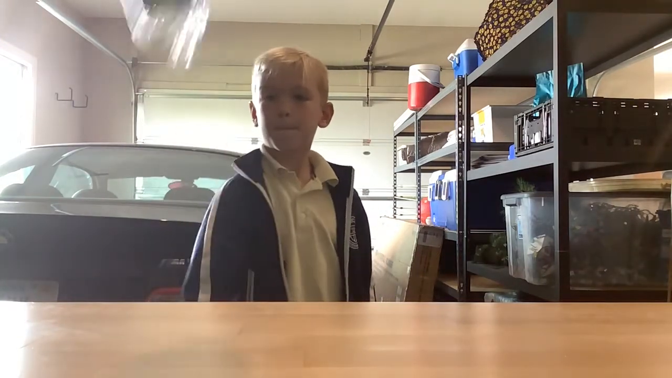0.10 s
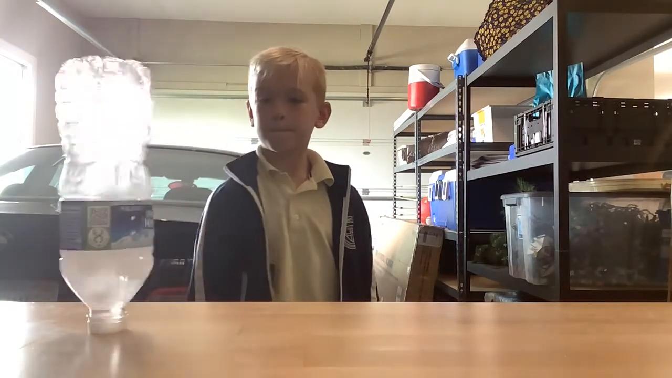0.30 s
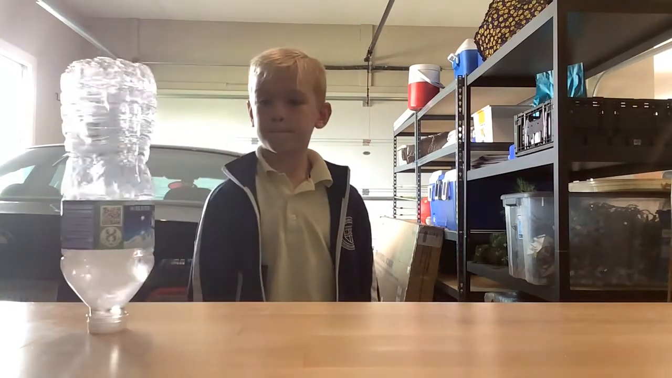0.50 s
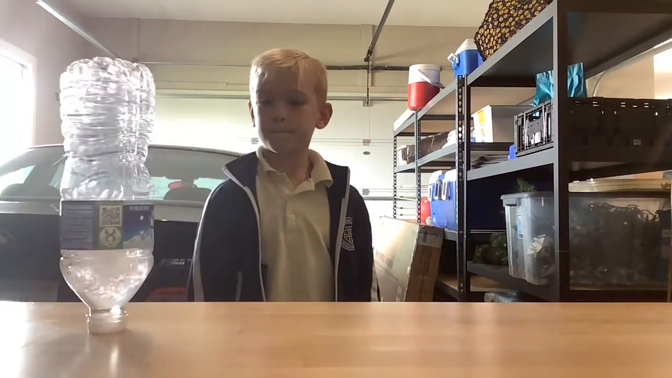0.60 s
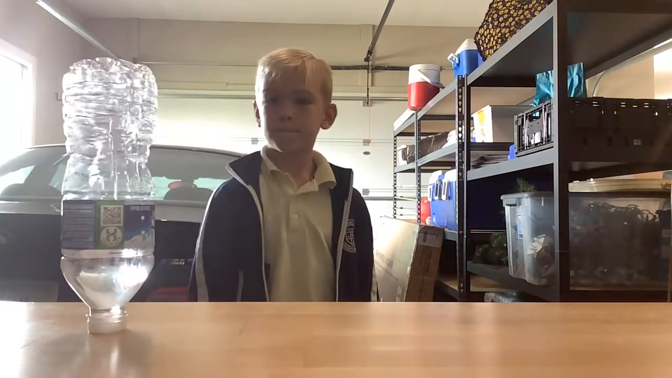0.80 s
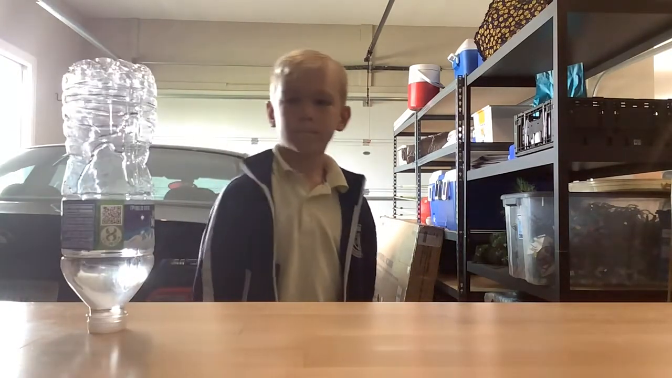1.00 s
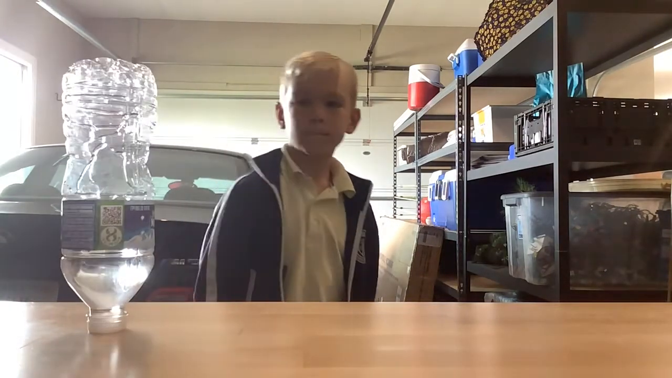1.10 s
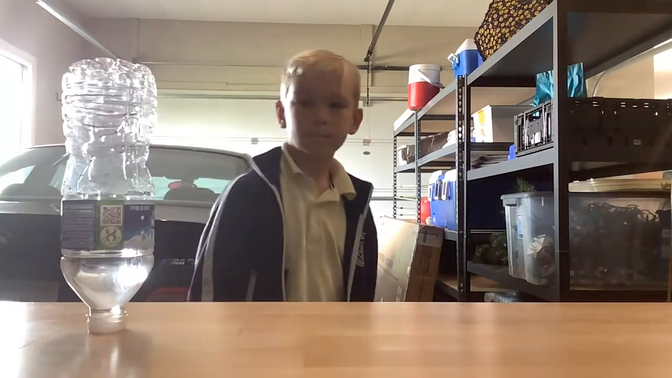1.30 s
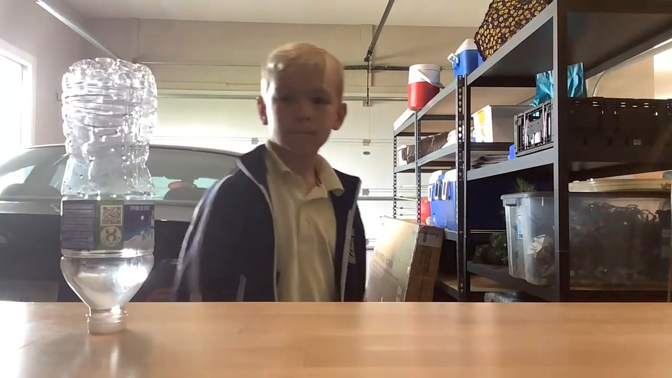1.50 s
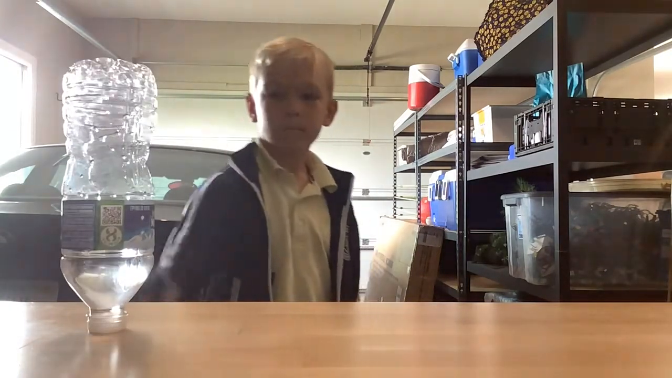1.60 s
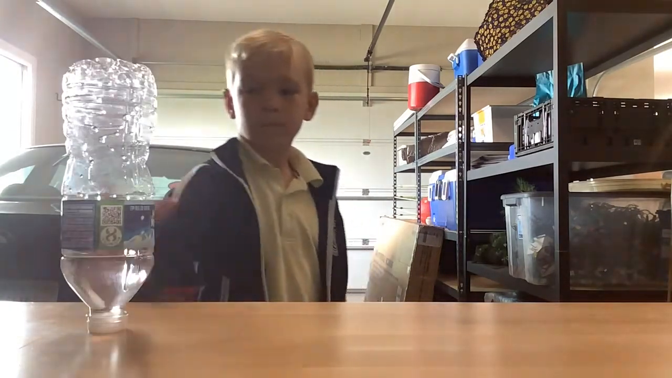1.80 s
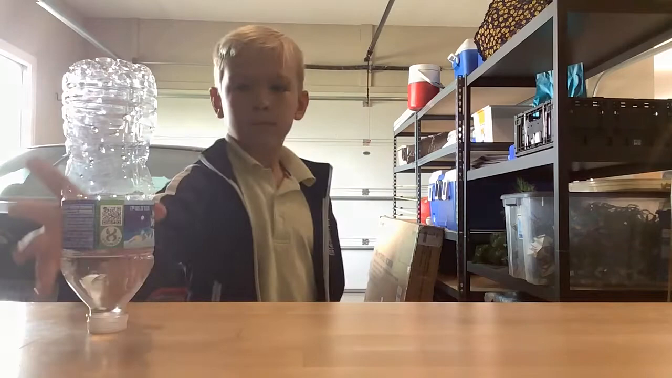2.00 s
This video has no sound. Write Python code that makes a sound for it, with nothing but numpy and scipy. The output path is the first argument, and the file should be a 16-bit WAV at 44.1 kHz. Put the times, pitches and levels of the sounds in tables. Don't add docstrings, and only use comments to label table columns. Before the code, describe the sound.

Sharp crack and thump of a water bottle landing on a wooden table in an echoing garage

```python
import sys
import numpy as np
from scipy import signal
from scipy.fft import rfft, irfft
from scipy.io import wavfile
from scipy.ndimage import uniform_filter1d

SR = 44100
rng = np.random.default_rng(int(sys.argv[2]) if len(sys.argv) > 2 else 0)


def inscribe(sig):
    pcm = np.round(np.clip(np.atleast_2d(sig).T, -1, 1) * 32767)
    wavfile.write(sys.argv[1], SR, pcm.astype(np.int16))


N = 88200
T = np.arange(N) / SR


def undb(db):
    return 10 ** (np.asarray(db) / 20)


def read(table, hz):
    rows = np.array(table, float)
    return np.interp(np.log(np.maximum(hz, 1)), np.log(rows[:, 0]), rows[:, 1])


def noise(table, peaks=(), ripple_db=0):
    hz = np.fft.rfftfreq(N, 1 / SR)
    db = read(table, hz)
    for centre, width, gain in peaks:
        db = db + gain * np.exp(-((hz - centre) / width) ** 2)
    db = db - 18 * np.log2(np.maximum(hz / table[-1][0], 1))
    ripple_spacing_hz = 24.8
    ripple = np.interp(hz / ripple_spacing_hz, np.arange(4000), rng.standard_normal(4000))
    spectrum = rfft(rng.standard_normal(N)) * undb(db + ripple_db * ripple)
    x = irfft(spectrum, N)
    return x / np.std(x)


def fade(start, t60, rise=0.0001):
    t = np.maximum(T - start, 0)
    return (1 - np.exp(-t / rise)) * undb(-60 * t / t60)


def bands(x, count=3):
    lowest_hz = 25
    hz, spectrum = np.fft.rfftfreq(N, 1 / SR), rfft(x)
    place = count * np.log2(np.maximum(hz, lowest_hz) / lowest_hz)
    for k in range(10 * count):
        weight = np.cos(np.pi / 2 * np.clip(place - k, -1, 1)) ** 2
        yield lowest_hz * 2 ** (k / count), irfft(spectrum * weight, N)


def walk(rate):
    k = int(SR / rate)
    steps = np.repeat(rng.standard_normal(N // k + 1), k)
    return 1.3 * uniform_filter1d(uniform_filter1d(steps, k), k)[:N]


BLOW_S = [
    .2222,
    .2258,
    .2292,
    .2316,
    .2495,
    .2665,
]
# crack level/dB, body level/dB
BLOWS = [
    (-14, -4),
    (-14.5, -25.5),
    (-16.5, -26),
    (-13, -20),
    (-33, -21),
    (-26, -13.5),
]
# f/Hz, level/dB, t60/s
BODY = [(93.5, -7, 0.12), (143, 0, .09), (178, -8, .09), (335.7, -14.5, 0.24), (379.5, -4, 0.15),
        (518.3, -6, 0.11), (664.3, -13.5, 0.055), (924.4, -4.5, .07), (1060, -14, 0.095),
        (1415, -10, 0.089), (1510, -10, 0.091), (1792, -8, .09), (2221, -10.5, .08), (2986, -9.5, 0.023)]
# f/Hz, level/dB
CRACK = [(500, -13.5), (1200, -6), (2300, -9), (2900, 2.5), (5200, -10.5), (7900, -1), (11000, -8),
         (15600, -17)]


def landing():
    out, crack, rattle = np.zeros(N), noise(CRACK), noise(CRACK)
    low_lag_s, lag_from_hz = 0.002, 4000
    for start, (crack_db, body_db) in zip(BLOW_S, BLOWS):
        out += undb(crack_db) * crack * fade(start, 0.022, rise=0.00035)
        out += undb(crack_db - 12) * rattle * fade(start, 0.017)
        for hz, db, t60 in BODY:
            at = start + low_lag_s * (np.sqrt(300 / hz) - np.sqrt(300 / lag_from_hz))
            tone = np.sin(2 * np.pi * hz * (T - at))
            out += undb(body_db + db) * tone * fade(at, t60, rise=0.25 / hz)
    return out


# f/Hz, level/dB, t60/s, delay t/s
SNAP = [(7780, -7.5, .01, 0), (12404, -13, 0.0074, 0), (2850, -8, .014, -.0004), (3270, -11, 0.007, 0),
        (1300, -10, .01, .0006), (10500, -15, .008, .0003)]


def snap():
    out = np.zeros(N)
    for hz, db, t60, lag in SNAP:
        tone = np.sin(2 * np.pi * hz * (T - BLOW_S[0]))
        out += undb(db) * tone * fade(BLOW_S[0] + lag, t60, rise=0.0003)
    return out


# f/Hz, level/dB
SURGE = [(100, 1), (600, -3.5), (1500, -12), (3000, -5), (5000, -12.5), (7800, -11.5), (8800, -36.5),
         (16000, -38)]
# f/Hz, width f/Hz, level/dB
SURGE_PEAKS = [(3100, 500, 7), (7700, 600, 9.5), (1480, 190, 3.5), (4300, 360, 11)]


def surge():
    hit, start = BLOW_S[0], 0.2005
    level_db, swell_db_per_s = -18, 1500.5
    swell = undb(level_db + swell_db_per_s * np.minimum(T - hit, 0))
    swell = swell * (T > start) * (T < hit + 0.002)
    brush = undb(-45.5) * noise(CRACK) * fade(start, 0.018, rise=0.0011)
    return noise(SURGE, SURGE_PEAKS) * uniform_filter1d(swell, size=40) + brush


# f/Hz, level/dB
SLOSH = [(60, -8), (150, -2), (400, 0), (900, -3.5), (1800, -8), (2500, -20)]


def slosh():
    uneven_db = 2 * walk(150)
    return undb(-16.5 + uneven_db) * noise(SLOSH) * fade(BLOW_S[0], 0.2, rise=0.009)


# f/Hz, level/dB, t60/s
RING = [(84.6, -19, .24), (148, -17, .2), (370.2, -15, 0.28), (860, -21.5, .15), (1785, -24.5, .2)]


def ring():
    out = np.zeros(N)
    for hz, db, t60 in RING:
        out += undb(db) * np.sin(2 * np.pi * hz * T) * fade(0.238, t60, rise=0.012)
    return out


# f/Hz, t60/s
GARAGE_T60 = [(80, 0.95), (250, 0.58), (700, 0.62), (1800, 0.76), (3200, .72), (8500, 0.6), (15000, 0.36)]


def echo(x, start, rise):
    out = 0
    for hz, band in bands(x, count=6):
        clumps_db = 1.34 * walk(70)
        env = fade(start, read(GARAGE_T60, hz), rise) * undb(clumps_db)
        power = (env * np.std(band)) ** 2
        knee_db = -89.5 + 3.5 * np.log2(hz / 1000)
        out = out + band * env * power / (power + undb(knee_db) ** 2 / 2)
    return out


# f/Hz, level/dB (per Hz)
GARAGE = [(35, -33.5), (60, -8.5), (283, -6), (675, -4), (2190, -11.5), (9170, -13), (15200, -22.5),
          (16000, -43)]
# f/Hz, width f/Hz, level/dB
GARAGE_PEAKS = [(2968, 380, 2.5), (6660, 280, 3.5), (2350, 380, -5.5), (5100, 120, 1), (730, 140, 3),
                (8200, 1400, 2), (5840, 250, -3.5), (403, 100, 4)]


def garage():
    return echo(undb(-10.5) * noise(GARAGE, GARAGE_PEAKS, ripple_db=2), BLOW_S[0], rise=0.027)


# f/Hz, level/dB
EARLIER = [(300, -23.5), (1000, -2), (2200, -6.5), (3500, -2.5), (5700, -3), (9600, -12.5), (13000, -14.5),
           (16500, -30.5)]


def earlier_toss():
    return echo(undb(-55) * noise(EARLIER, ripple_db=2), 0, rise=1e-5)


TICK_S = [
    .912,
    .985,
    1.312,
    1.3465,
    1.59,
]
# level/dB, t60/s
TICKS = [
    (-70, 0.036),
    (-75, .04),
    (-81, 0.17),
    (-65.5, 0.058),
    (-77, .04),
]
# f/Hz, level/dB
TICK = [(1000, -6), (3000, 3), (4800, -4), (6800, 1.5), (9000, -1), (11800, 0), (15000, -7), (16500, -25)]


def ticks():
    envelope = np.zeros(N)
    for start, (db, t60) in zip(TICK_S, TICKS):
        envelope += undb(db) * fade(start, t60, rise=0.0012)
    return noise(TICK) * envelope


# f/Hz, level/dB
HUM = [(59.3, -66.5), (118.4, -68.5), (177.6, -70), (209.9, -74), (236.9, -63), (355.3, -70), (523, -79)]


def hum():
    out = np.zeros(N)
    for hz, db in HUM:
        level = undb(db + 3.5 + 2.5 * walk(9.9))
        pitch_hz = hz + 1.4 * walk(4.9) / 2
        out += level * np.sin(2 * np.pi * np.cumsum(pitch_hz) / SR)
    return out


# f/Hz, level/dB (per Hz)
AIR = [(30, -45.5), (52, -9), (240, -7.5), (275, -14.5), (340, -6.5), (480, -17), (1300, -31), (2000, -44)]


def air():
    return undb(-56.5) * sum(band * undb(walk(9)) for hz, band in bands(noise(AIR)))


# f/Hz, level/dB (per Hz)
HISS = [(500, -8.5), (2000, 1), (4200, 1.5), (6600, -0.5), (9000, -1.5), (13000, -3.5), (15500, -10.5),
        (16500, -27.5)]


def hiss():
    return undb(-79.5) * noise(HISS, [(6600, 250, 2.5)])


def scene():
    bottle = landing() + snap() + surge() + slosh() + ring()
    room = garage() + earlier_toss()
    return (bottle + room + ticks() + hum() + air() + hiss())[None]


def band_limit(x):
    return signal.sosfilt(signal.butter(12, 16830, fs=SR, output="sos"), x)


def record(dry):
    t = np.maximum(T - 0.23146, 0)
    duck_db, duck_in_s, duck_out_s = -10.5, 0.009, 0.14
    duck = undb(duck_db * (1 - np.exp(-t / duck_in_s)) * np.exp(-(t / duck_out_s) ** 2 / 2))
    bass_cut = signal.butter(4, 58, "high", fs=SR, output="sos")
    top_cut = signal.ellip(8, 0.3, 60, 16000, fs=SR, output="sos")
    x = signal.sosfilt(bass_cut, dry * duck)
    x = 1.2 * np.tanh(x / 1.2)
    x = signal.sosfilt(top_cut, x)
    return band_limit(x)


dry = scene()
out = record(dry)
inscribe(out)
```